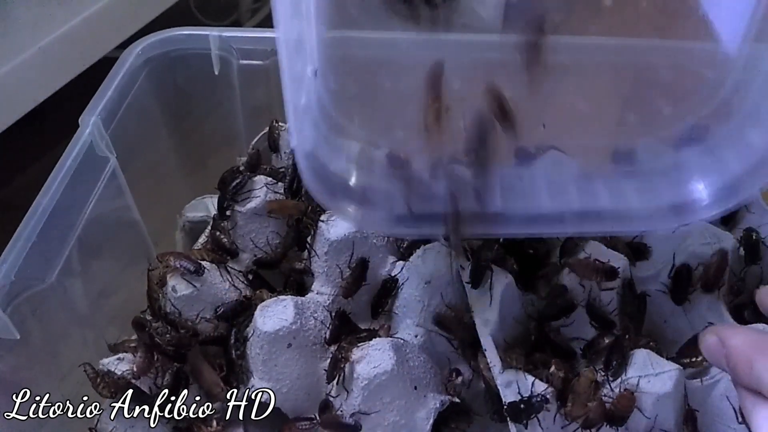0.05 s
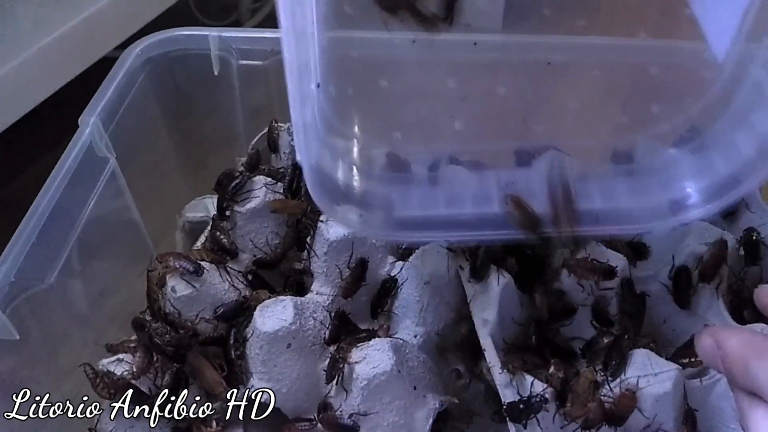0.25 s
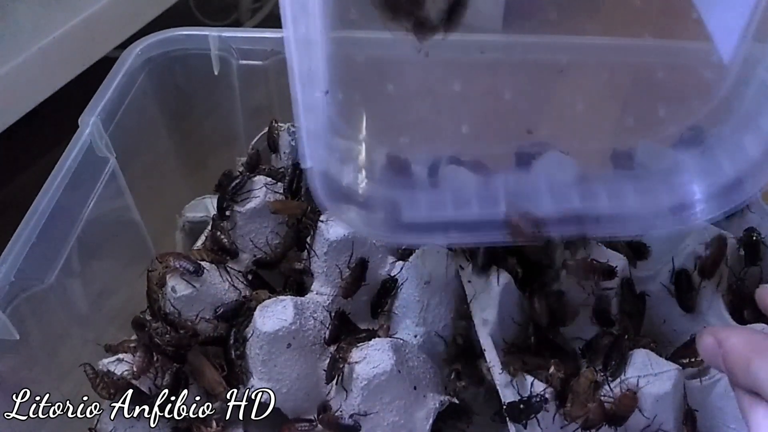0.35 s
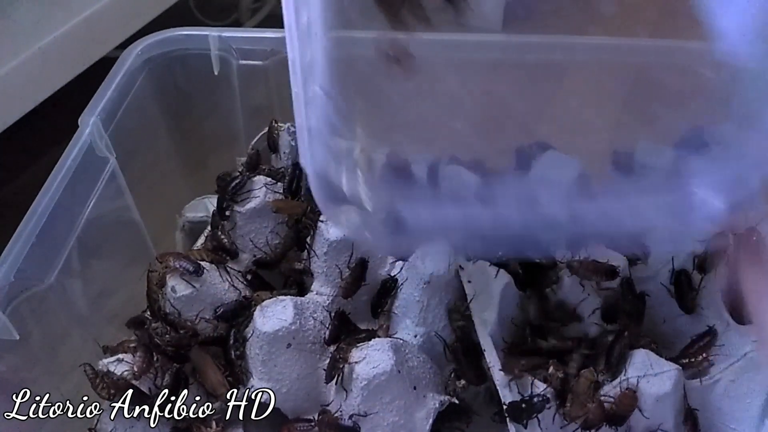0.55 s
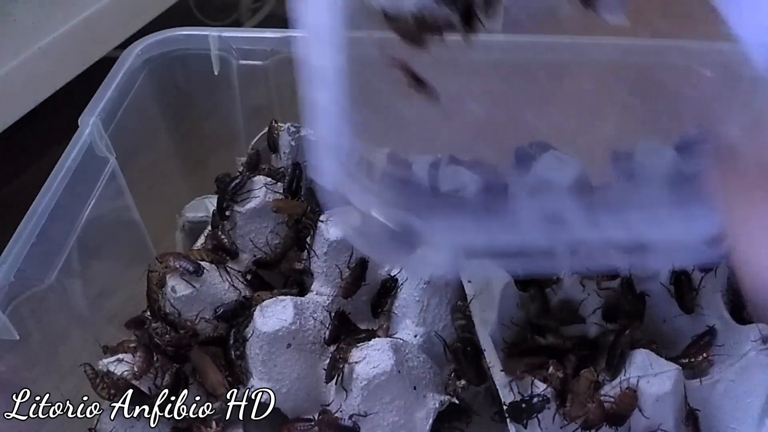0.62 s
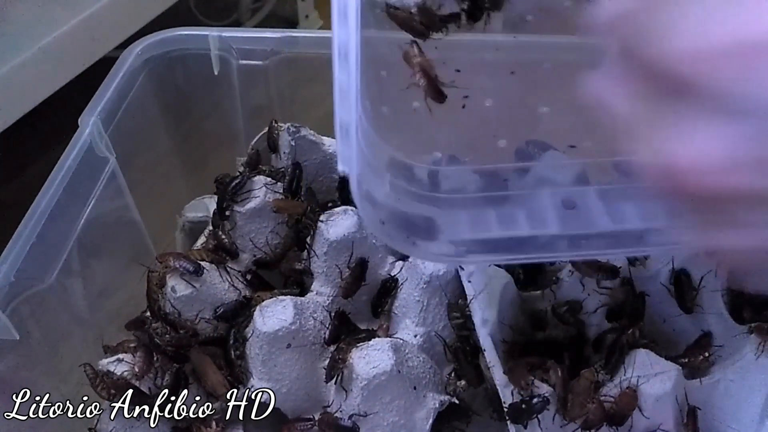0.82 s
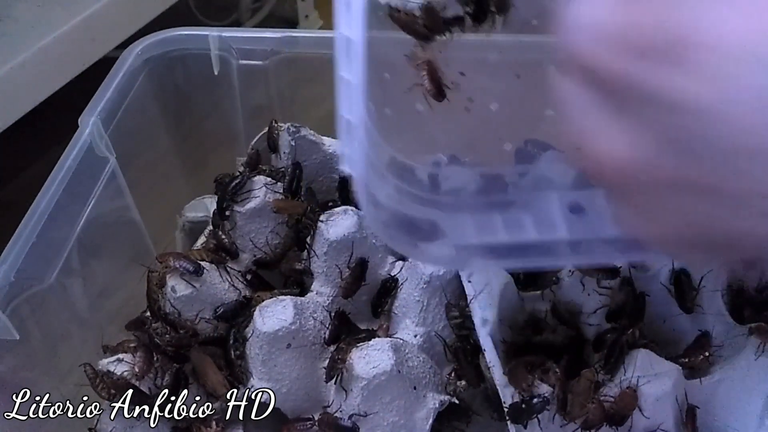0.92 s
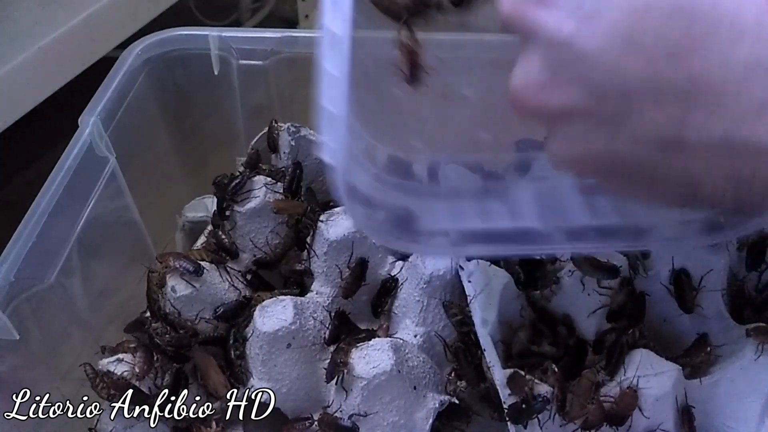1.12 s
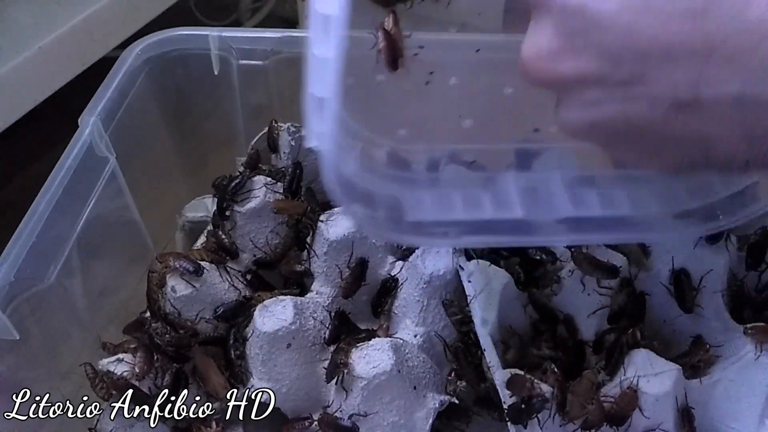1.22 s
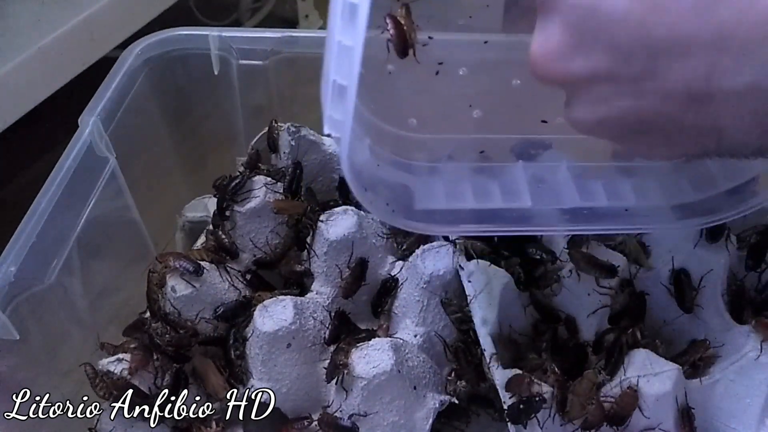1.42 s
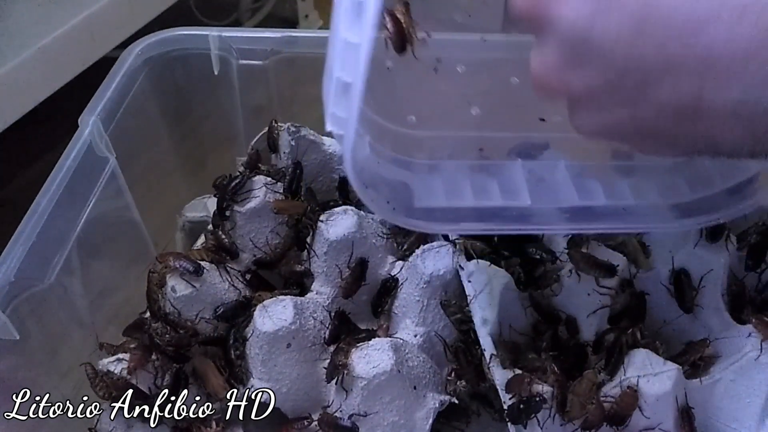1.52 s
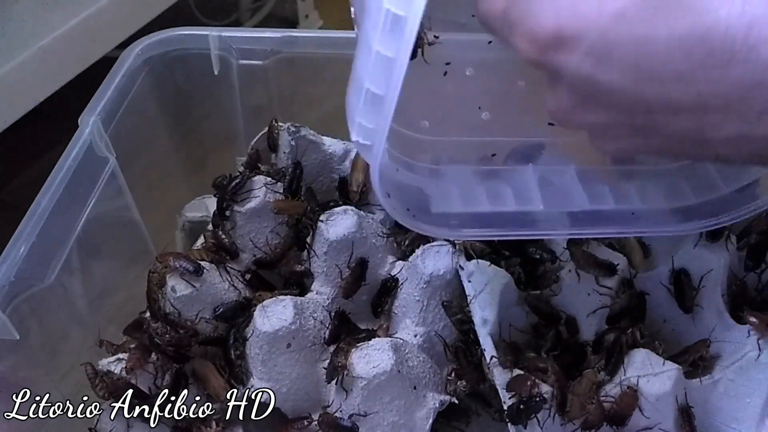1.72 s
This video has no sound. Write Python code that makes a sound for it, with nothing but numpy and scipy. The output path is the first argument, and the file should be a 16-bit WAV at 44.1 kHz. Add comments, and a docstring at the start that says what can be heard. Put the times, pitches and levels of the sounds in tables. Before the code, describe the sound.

Cockroaches tick and scrabble on plastic and cardboard as a tub is shaken and thumped.

```python
"""Cockroaches, shaken out of a plastic tub onto egg cartons, heard close up in a small quiet room.
Their legs scrabble, their bodies tick and knock on the walls, and the thin tub flexes with low wobbles.
A hand thumps the tub once; skin rubs and squeaks on the plastic, and the last insects slide down.
The stereo microphone has a dull top end, and the tub sits a little to its left."""
import sys
import numpy as np
from scipy import signal
from scipy.fft import rfft, irfft
from scipy.io import wavfile

SR = 44100
rng = np.random.default_rng(int(sys.argv[2]) if len(sys.argv) > 2 else 0)


def persist_wave(psi):
    """Save psi, clipped to +-1, as 16-bit WAV."""
    counts = np.round(np.clip(psi, -1, 1) * 32767).astype(np.int16)
    wavfile.write(sys.argv[1], SR, np.atleast_2d(counts).T)


N = 77175
T = np.arange(N) / SR
TUB_T60_S, ROOM_T60_S = 0.02, 0.31
KNOCK_WET_DB, FRICTION_RISE_S = -11, 0.0012
RUB_PAN_DB, THUMP_PAN_DB, SLIDE_PAN_DB = 10, 5.5, 7.5


def from_db(db):
    """Decibels to gain."""
    return 10 ** (np.asarray(db) / 20)


def rms_one(x):
    """Scale to unit power."""
    return x / np.sqrt(np.mean(x ** 2) + 1e-20)


def level(curve):
    """Gain over time from (time [s], level [dB]) points."""
    return from_db(np.interp(T, *np.transpose(curve)))


def pan(db):
    """Left and right gains for a level difference; positive is to the left."""
    return from_db(np.array([[db], [-db]]) / 2)


def colour(x, points):
    """Shape a spectrum by (frequency [Hz], level [dB]) points, rolled off below the first; unit power."""
    hz, db = np.transpose(points)
    f = np.maximum(np.arange(N + 1) * SR / (2 * N), 1)
    gain = from_db(np.interp(np.log(f), np.log(hz), db)) * np.minimum(f / hz[0], 1) ** 2
    return rms_one(irfft(rfft(x, 2 * N) * gain)[..., :N])


def band(x, low_hz, high_hz):
    """Band-pass with gentle slopes."""
    edges = [low_hz, min(high_hz, .45 * SR)]
    return signal.sosfilt(signal.butter(2, edges, "band", fs=SR, output="sos"), x + 1e-18)


def band_around(x, hz, octaves):
    """Band-pass by centre and width."""
    half = 2 ** (octaves / 2)
    return band(x, hz / half, hz * half)


def resonance(x, hz, width_hz):
    """One resonant peak."""
    return signal.lfilter(*signal.iirpeak(hz, hz / width_hz, fs=SR), x)


def drift(per_s):
    """A line wandering through random points with a spread of one."""
    points = rng.standard_normal(400)
    return np.interp(T * per_s, np.arange(len(points)), points)


def click(s):
    """A unit impulse."""
    return 1. * (np.arange(N) == int(s * SR))


def swell(s, rise_s, decay_s):
    """An envelope that rises and dies away."""
    age = np.maximum(T - s, 0)
    return (1 - np.exp(-age / rise_s)) * np.exp(-np.minimum(age / decay_s, 40))


def tone(s, hz, rise_s, t60):
    """A dying sine."""
    return np.sin(2 * np.pi * hz * (T - s)) * swell(s, rise_s, t60 / np.log(1000))


def echoes(x, t60):
    """Dense reflections, different in each channel."""
    tail = rng.standard_normal((2, N)) * swell(.001, .001, t60 / np.log(1000))
    return signal.fftconvolve(np.atleast_2d(x), rms_one(tail) / np.sqrt(N), axes=1)[:, :N]


def in_tub(x):
    """Direct sound and quick reflections between the plastic walls."""
    return x + from_db(-1) * echoes(x, TUB_T60_S)


def scratch(s, hz, octaves, decay_s):
    """A short burst of friction around one pitch, partly different in each channel."""
    friction = rng.standard_normal(N) + from_db(3.5) * rng.standard_normal((2, N))
    return rms_one(band_around(friction, hz, octaves)) * swell(s, FRICTION_RISE_S, decay_s)


def room_tone():
    """The faint, low background of the room, partly common to both channels."""
    # spectrum of the room: (frequency [Hz], relative density [dB])
    spectrum = [(35, -13), (70, -32.5), (108, 9), (150, -18), (300, -0.5), (900, -4.5), (1600, -13.5),
                (3000, -13.5), (6500, -28.5), (9000, -36.5), (14000, -40.5)]
    air = rng.standard_normal((2, N)) + rng.standard_normal(N)
    return colour(air, spectrum) * from_db(-72.5) * pan(6.5)


def handling():
    """The hand rumbles on the tub and scuffs along its rim as it takes hold."""
    # loudness of the rumble and of the scuff: (time [s], level [dB])
    rumble_curve = [(0, -60), (.13, -71.5), (.2, -49), (.35, -60), (.44, -57), (.6, -53), (.74, -59.5),
                    (.82, -56.5), (.9, -57.5), (.97, -61), (1.05, -75.5), (1.33, -84.5), (1.38, -73),
                    (1.45, -69.5), (1.52, -65.5), (1.62, -82), (1.75, -74)]
    scuff_curve = [(.845, -81), (.856, -35), (.872, -33.5), (.885, -50.5), (.9, -48), (.92, -55),
                   (.935, -50), (.946, -46.5), (.958, -43.5), (.97, -46.5), (.988, -53), (1.01, -66),
                   (1.06, -78.5), (1.75, -100)]
    # their spectra: (frequency [Hz], relative density [dB])
    rumble_spectrum = [(40, -2.5), (65, -4), (110, 6), (170, 0), (240, -6), (350, -20), (700, -49.5)]
    scuff_spectrum = [(300, -34), (430, -3), (540, 1), (660, -1), (860, 5), (980, -9.5), (1080, -11),
                      (1600, -20), (3000, -19), (7000, -39)]
    rumble = colour(rng.standard_normal(N), rumble_spectrum) * level(rumble_curve)
    scuff = colour(in_tub(rng.standard_normal(N)), scuff_spectrum) * level(scuff_curve)
    return rumble * pan(5.5) + scuff * pan(3.5)


def squeaks():
    """A finger sticks and slips on the rim in short, rough tones; the pitch sags as it presses harder."""
    # finger presses: (time of peak [s], level [dB], half length [s])
    presses = [(1.074, -65, .007), (1.203, -56, .007), (1.255, -67, .018)]
    pitch_hz, sag_hz, waver_hz, rough_db = 2070, 25, 25, 2
    press = sum(from_db(db) * np.exp(-.5 * ((T - s) / half_s) ** 2) for s, db, half_s in presses)
    hz = pitch_hz - sag_hz * press / press.max() + waver_hz * drift(220)
    wave = np.sin(2 * np.pi * np.cumsum(hz) / SR) * from_db(rough_db * drift(223.7))
    return wave * press * pan(RUB_PAN_DB)


def rubbing():
    """Skin friction sings in one wall resonance."""
    # loudness of the rubbing: (time [s], level [dB])
    curve = [(.38, -98), (.43, -46.5), (.49, -47.5), (.53, -52), (.71, -69), (.75, -45.5), (.81, -48),
             (.87, -66.5), (1.11, -79), (1.145, -63.5), (1.27, -65), (1.32, -66), (1.36, -58.5),
             (1.42, -65), (1.455, -47.5), (1.5, -51.5), (1.535, -50.5), (1.59, -68), (1.615, -71),
             (1.66, -74), (1.75, -80)]
    wall_hz = 1610
    sing = resonance(rng.standard_normal(N), wall_hz, width_hz=65)
    sing = band(sing, wall_hz * 0.34, wall_hz * 0.91)  # favours the noise below the peak
    return rms_one(in_tub(sing)) * level(curve) * pan(RUB_PAN_DB)


def scraping():
    """The tub scrapes: uneven slips ring a wall resonance that rises as the contact moves along."""
    # course of the scrape: (time [s], level [dB], pitch [Hz])
    course = [(1.39, -99, 850), (1.42, -66, 880), (1.436, -55, 1000), (1.46, -51, 1170),
              (1.495, -50.5, 1230), (1.54, -62, 1280), (1.585, -88, 1330), (1.614, -56.5, 1420),
              (1.64, -87, 1420)]
    slips_per_s, width_hz = 900, 120
    times, levels, pitches = np.transpose(course)
    db, hz = np.interp(T, times, levels), np.interp(T, times, pitches)
    slips = rng.standard_normal(N) * (rng.random(N) < slips_per_s / SR)
    # a gliding resonance: shift down by the pitch, smooth, shift back up
    carrier = np.exp(2j * np.pi * np.cumsum(hz) / SR)
    pole = np.exp(-2 * np.pi * width_hz / SR)
    ring = (carrier * signal.lfilter([1], [1, -2 * pole, pole ** 2], slips / carrier)).real
    return rms_one(in_tub(ring)) * from_db(db) * pan(SLIDE_PAN_DB)


def flexing():
    """The thin tub bends and gives low, dying wobbles."""
    # wobbles: (time [s], level [dB], pitch [Hz], t60 [s], left over right [dB])
    wobbles = [(0.181, -32, 132, 0.18, 1.5), (0.208, -36.5, 295, 0.068, 2.5), (.214, -32, 125, 0.17, 1.5),
               (0.274, -38.5, 126.5, 0.19, 1.5), (.425, -47, 240, .12, 6), (0.513, -34.5, 114, 0.097, 33),
               (0.527, -38.5, 61.5, 0.18, 29), (0.559, -39.5, 96, 0.11, 33), (0.633, -44, 82, 0.14, 30),
               (0.647, -33, 103, 0.1, 23), (0.853, -22.5, 78, 0.096, 8), (0.951, -39.5, 121, 0.041, 7.5),
               (1.366, -48.5, 105.5, 0.097, 1)]
    return sum(tone(s, hz, rise_s=0.0028, t60=t60) * from_db(db) * pan(side_db)
               for s, db, hz, t60, side_db in wobbles)


def boom():
    """The floor of the tub swings under the blow of the hand, and the room answers faintly."""
    swing = tone(s=.8478, hz=149, rise_s=0.009, t60=0.045) * from_db(-2) * pan(THUMP_PAN_DB)
    return swing + from_db(-22.5) * echoes(swing, ROOM_T60_S)


def thump():
    """A slap of the hand thuds and rings the tub, which rattles and settles."""
    # contacts within the one blow: (time [s], relative level [dB], treble roll-off [Hz])
    contacts = [(0.8499, -0.5, 6000), (0.8539, -13, 4900), (0.8672, -4, 2570), (0.8702, -11.5, 2640)]
    # modes of the tub: (frequency [Hz], relative level [dB], t60 [s])
    modes = [(404, -24, 0.023), (504, -25.5, 0.074), (547, -33, 0.066), (850, -45.5, 0.08),
             (900, -37, 0.05), (1275, -18.5, 0.017), (1543, -28, 0.058), (1804, -19.5, 0.019),
             (2566, -30.5, 0.033), (2970, -31, 0.026), (3180, -23.5, 0.019), (6020, -22.5, 0.017)]
    ring = 0
    for s, db, soft_hz in contacts:
        for hz, mode_db, t60 in modes:
            strength = from_db(db + mode_db + rng.normal(0, 0.65)) * rng.choice([-1, 1])
            softening = (1 + (hz / soft_hz) ** 4) ** -.5
            ring += tone(s, hz, rise_s=0.0014, t60=t60) * strength * softening
    slap = scratch(contacts[0][0], hz=2330, octaves=2, decay_s=0.011) * from_db(-31.5)
    pulses = sum(from_db(db - 28) * swell(s, FRICTION_RISE_S, decay_s=.005) for s, db, _ in contacts)
    thud = rms_one(band_around(rng.standard_normal(N), hz=480, octaves=.7)) * pulses
    reflections = from_db(KNOCK_WET_DB) * echoes(ring, TUB_T60_S)
    return (ring + thud + reflections + in_tub(slap)) * pan(THUMP_PAN_DB)


def footfalls(per_s):
    """Tiny random leg contacts, per_s in each half-octave band of each channel; every band flickers."""
    spread_db, flicker_db = 4.5, 2
    edges_hz = np.geomspace(200, 12800, 13)
    patter = 0
    for low, high in zip(edges_hz, edges_hz[1:]):
        sizes = from_db(spread_db * np.minimum(rng.exponential(1, (3, N)), 4))
        signs = rng.choice([-1, 1], (3, N))
        hits = rms_one(sizes * signs * (rng.random((3, N)) < per_s / 2 / SR))
        stereo = hits[:2] + from_db(-2.5) * hits[2]  # the third stream reaches both channels
        patter += band(stereo, low, high) * from_db(flicker_db * drift(50.16))
    return patter


def sliding():
    """The last insects slide down the thin wall and ring two of its resonances."""
    # loudness of the slide: (time [s], level [dB])
    curve = [(1.335, -91), (1.357, -53.5), (1.395, -67.5), (1.42, -58), (1.44, -50.5), (1.458, -45),
             (1.472, -58.5), (1.53, -57), (1.585, -65.5), (1.61, -67), (1.65, -80), (1.685, -77),
             (1.7, -57), (1.745, -83)]
    # spectrum of the friction: (frequency [Hz], relative density [dB])
    spectrum = [(200, -11.5), (500, -0.5), (670, -16.5), (820, 9), (1050, -0.5), (1220, 4.5), (1380, 0.5),
                (1700, 3), (2150, -1.5), (2600, 1.5), (3300, -5.5), (3850, -14.5), (4400, -2.5),
                (5100, -9.5), (5500, -3.5), (6200, -18.5), (7500, -11)]
    friction = colour(footfalls(per_s=4000), spectrum)
    ring = sum(resonance(friction, hz, width_hz=150) for hz in (4430, 5480))
    return rms_one(friction + ring) * level(curve) * pan(SLIDE_PAN_DB)


def knock(s, hz, wall_db):
    """A hard little body strikes, rebounds and rings the wall; peak one."""
    rebound_s, rebound_db = 0.00104, -8.5
    strikes = click(s) + from_db(rebound_db) * click(s + rebound_s)
    tap = band(strikes, hz * 0.68, hz * 2)
    tap = signal.sosfilt(signal.butter(4, 700, "high", fs=SR, output="sos"), tap)
    tap = tap + from_db(wall_db) * resonance(tap, hz=900, width_hz=80)
    return tap / np.abs(tap).max()


def tick(s, hz):
    """A hard claw or shell gives a very short, bright snap; peak one."""
    burst = rng.standard_normal((2, N)) * swell(s, rise_s=.0002, decay_s=.0006)
    snap = band_around(burst, hz, octaves=.9)
    return snap / np.abs(snap).max()


def falling_insects():
    """Close knocks and ticks, and scratches that echo more in the tub; all reach the right side later."""
    # bodies on plastic: (time [s], peak [dB], pitch [Hz], wall ring [dB], left over right [dB])
    bodies = [(0.037, -26.5, 1000, -1, 5.5), (0.1593, -38.5, 900, 28, 11), (0.214, -32, 940, 19.5, 10.5),
              (0.2905, -14.5, 1200, 2, 13.5), (0.291, -28, 2600, -7, 23), (0.3458, -28.5, 1100, -11, 12),
              (0.3469, -20.5, 950, 11, 5), (0.351, -14, 1900, -7, 8), (.537, -25, 930, 2, 6),
              (0.5477, -20.5, 1600, 1, 17.5), (0.5505, -17.5, 1500, 7.5, -8), (.5517, -33, 1700, 12, 11),
              (0.6543, -19, 1050, 1, 16), (.672, -29.5, 1190, 14, 0.5)]
    # claws and shells: (time [s], peak [dB], pitch [Hz], left over right [dB])
    claws = [(0.2442, -16, 3800, 7), (.2482, -20, 4200, 8), (.259, -30, 7500, 4), (.392, -27, 6000, 2.5),
             (.4213, -15, 6800, 3), (.432, -31, 9000, 2), (0.5095, -18, 3800, 4), (0.5483, -24, 6500, 3),
             (.6485, -32, 7000, 1), (0.6765, -19, 8400, 1), (.688, -32, 9500, 1), (.6935, -23, 2900, 6),
             (.7045, -26, 3200, 5), (.711, -28, 7000, 6), (0.746, -19.5, 5000, 5), (.752, -20.5, 5800, 4),
             (0.8318, -24, 5300, 4)]
    # scratches: (time [s], level [dB], centre [Hz], width [octaves], decay [s], left over right [dB])
    strokes = [(0.122, -48.5, 3100, 0.22, 0.0041, 7), (0.034, -39, 5180, 0.69, 0.019, 3),
               (0.203, -22.5, 2710, 0.15, 0.0038, 3.5), (0.2085, -34, 2720, 0.12, 0.0013, 8.5),
               (0.242, -25, 3330, 0.57, 0.0028, 12), (0.29, -29.5, 3180, 0.53, 0.004, 13.5),
               (0.3198, -25, 2980, 1.3, 0.0031, 6.5), (0.352, -28, 4900, 0.37, 0.0037, 1),
               (0.39, -34, 4640, 0.69, 0.011, 0.5), (0.4196, -26, 5260, 0.66, 0.0038, 4.5),
               (0.5096, -37, 3250, 0.72, 0.0054, 19), (0.544, -43.5, 4050, 1.4, 0.0032, 2.5),
               (0.5947, -24.5, 4700, 0.21, 0.0022, 4), (0.633, -35.5, 1970, 0.98, 0.036, 1.5),
               (.8312, -28.5, 4870, 0.6, 0.0028, 3.5), (0.9382, -35, 844, 0.25, 0.0062, 7.5),
               (1.1275, -51.5, 3380, .2, 0.0018, 8), (1.44, -41.5, 5150, 0.25, 0.013, 2),
               (1.444, -47.5, 4330, 0.033, 0.0092, 15), (1.454, -39.5, 5640, 1.2, 0.0026, -9),
               (1.597, -60, 2720, .3, 0.019, 1)]
    right_lag_s = 0.00016
    knocks = sum(knock(s, hz, wall_db) * from_db(db) * pan(side_db)
                 for s, db, hz, wall_db, side_db in bodies)
    ticks = sum(tick(s, hz) * from_db(db) * pan(side_db) for s, db, hz, side_db in claws)
    scratches = sum(scratch(s, hz, octaves, decay_s) * from_db(db) * pan(side_db)
                    for s, db, hz, octaves, decay_s, side_db in strokes)
    reflections = echoes(from_db(KNOCK_WET_DB) * knocks + from_db(-14) * ticks, TUB_T60_S)
    left, right = knocks + ticks + reflections + in_tub(scratches)
    return np.array([left, np.interp(T - right_lag_s, T, right)])


def scrabbling():
    """Many legs patter on plastic and cardboard."""
    # how hard the insects scrabble: (time [s], relative level [dB])
    effort = [(0, -46), (.025, -56), (.038, -42.5), (.052, -46), (.075, -50), (.095, -61.5), (.155, -62.5),
              (.163, -44), (.2, -43), (.23, -44.5), (.25, -39), (.32, -41), (.345, -39), (.372, -46),
              (.42, -41.5), (.45, -44), (.495, -45.5), (.55, -40), (.585, -49.5), (.62, -45.5), (.675, -45),
              (.72, -46), (.75, -44.5), (.82, -51.5), (.88, -47.5), (.92, -72.5), (.97, -63.5),
              (1.04, -78.5), (1.75, -79)]
    # spectrum of the legs: (frequency [Hz], relative density [dB])
    spectrum = [(200, -18), (320, -11), (390, -13), (480, -8), (640, -14.5), (750, -3), (890, 3.5),
                (1050, -4.5), (1300, -7.5), (1800, 0), (2300, -3.5), (2850, 1), (3900, -7), (4900, -5),
                (5700, -7.5), (6400, -9.5), (7100, -21.5), (9000, -15), (12000, -11)]
    legs = colour(footfalls(per_s=2200), spectrum)
    return legs * level(effort) * from_db(4.5) * pan(5)


def scene():
    """Insects, tub and hand close to the microphone; the sharp hits carry into the small room."""
    hits = falling_insects() + thump()
    room = room_tone() + from_db(-14) * echoes(hits, ROOM_T60_S)
    legs = scrabbling() + sliding()
    tub = flexing() + boom() + rubbing() + scraping() + squeaks() + handling()
    return room + tub + legs + hits


def record(dry):
    """A dull microphone with a steep treble edge, a small peak above it and faint hiss; the top is cut."""
    low_cut_hz, edge_hz, top_hz = 29, 7160, 15800
    dull = signal.sosfilt(signal.cheby1(10, .3, edge_hz, fs=SR, output="sos"), dry)
    sizzle = from_db(-13.5) * band(dry, 8466, 9230)
    leak = from_db(-35.5) * dry
    heard = signal.sosfilt(signal.butter(2, low_cut_hz, "high", fs=SR, output="sos"), dull + sizzle + leak)
    hiss = from_db(-85.5) * rng.standard_normal((2, N))
    return signal.sosfilt(signal.cheby2(12, 70, top_hz, fs=SR, output="sos"), heard + hiss)


dry = scene()
out = record(dry)
persist_wave(out)
```